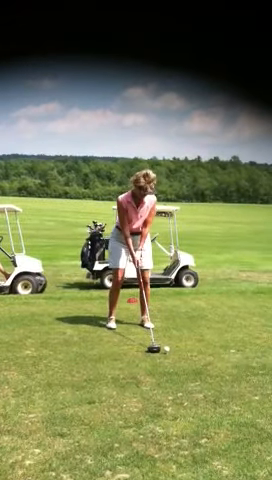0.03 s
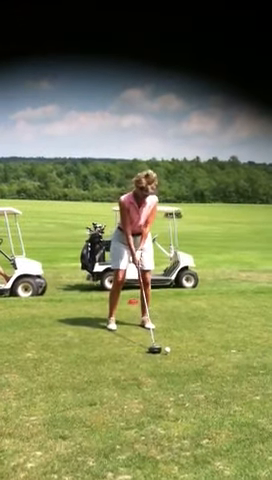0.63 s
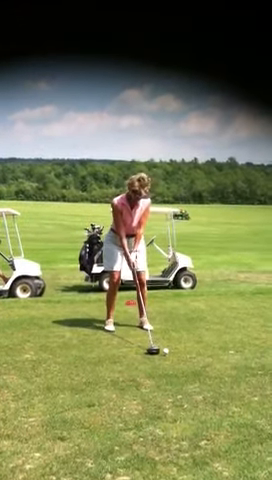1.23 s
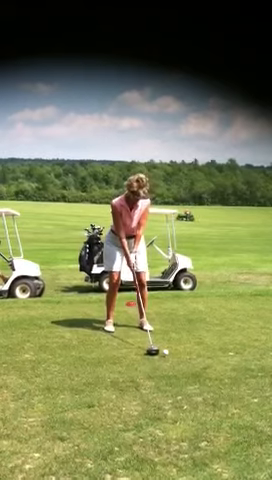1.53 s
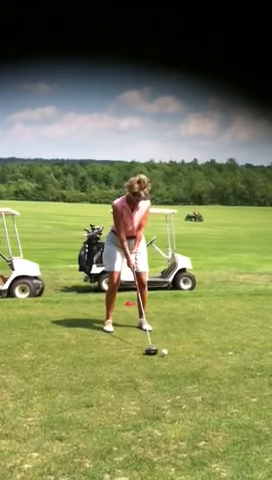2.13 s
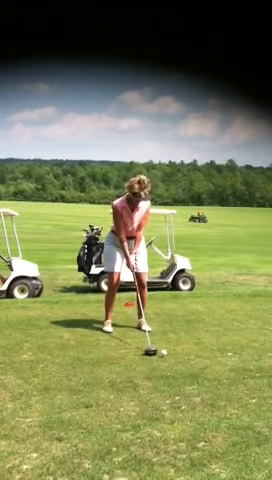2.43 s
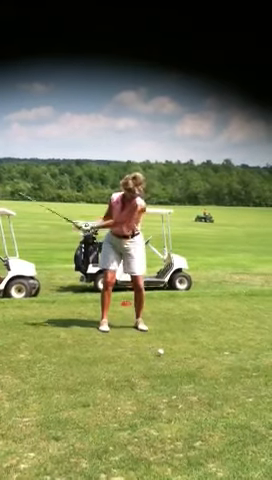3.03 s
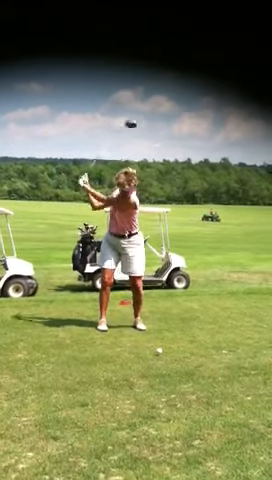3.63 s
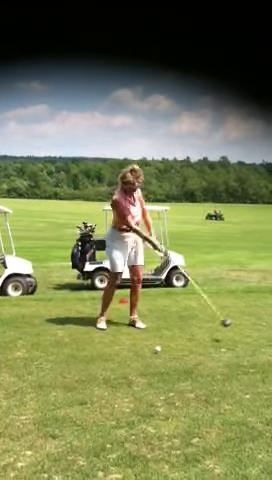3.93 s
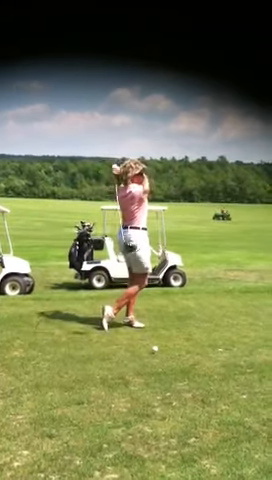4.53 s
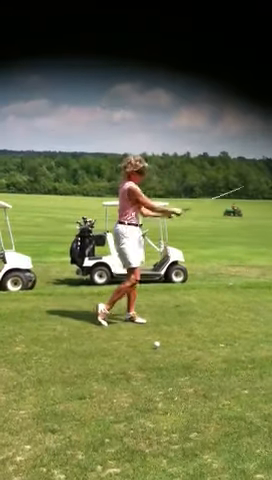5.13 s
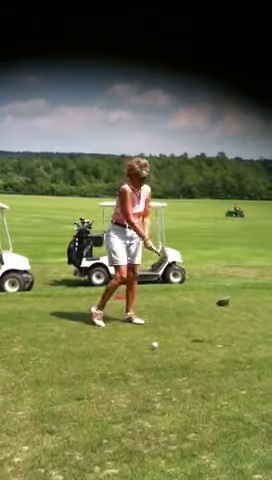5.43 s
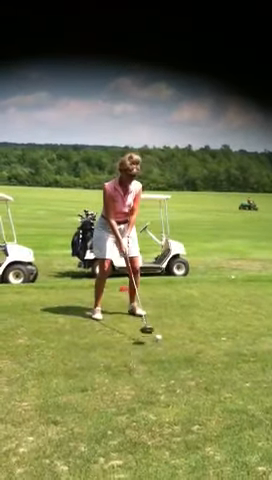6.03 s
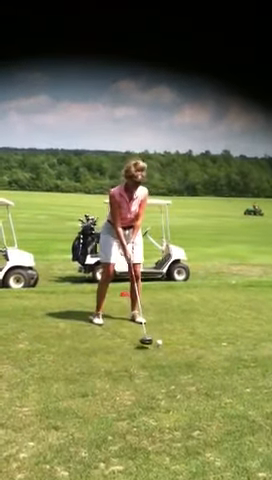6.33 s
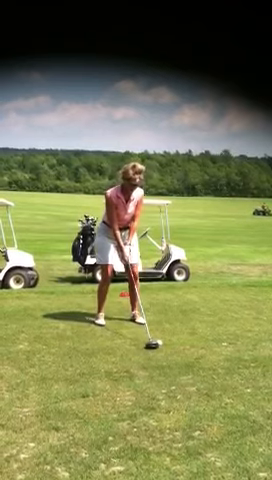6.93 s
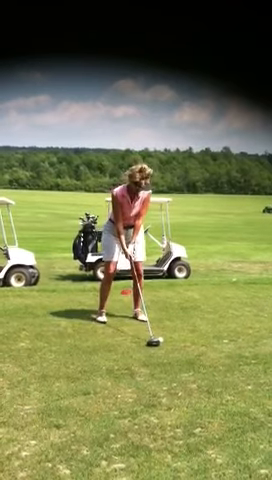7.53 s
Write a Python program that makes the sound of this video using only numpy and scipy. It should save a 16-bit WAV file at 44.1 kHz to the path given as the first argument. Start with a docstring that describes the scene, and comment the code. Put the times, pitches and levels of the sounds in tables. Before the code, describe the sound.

Gusts of wind rumble and thump on a small microphone at an open golf course, then die down. A breeze hisses softly in the trees and grass while a distant mower drones with a thin whine. A golf club swishes once, barely brushing the turf, followed by soft rustling. A far bird whistles, a faint hollow blip sounds, and the wind returns at the end.

```python
"""Open golf course. From the start, gusts buffet a small microphone: eddies at its port rumble and thump.
Throughout, a breeze hisses in trees and grass and a far three-cylinder mower drones with a thin whine.
The gusts die down by 3 s. At 4 s a practice swing swishes once and just clips the turf; the golfer
then rustles softly. After 6 s a distant bird whistles, then a faint hollow blip sounds.
The gusts return at the end."""
import sys
import numpy as np
from scipy import signal
from scipy.fft import rfft, irfft, next_fast_len
from scipy.io import wavfile
from scipy.ndimage import uniform_filter1d

SR = 44100
rng = np.random.default_rng(int(sys.argv[2]) if len(sys.argv) > 2 else 0)


def wav_record(signal):
    """Record a signal, one row per channel, as 16-bit PCM in the file named by sys.argv[1]."""
    frames = np.transpose(np.atleast_2d(signal))
    bounded = np.clip(frames, -1, 1)
    # unit amplitude maps onto the largest positive 16-bit level
    quanta = np.round(bounded * 32767).astype(np.int16)
    wavfile.write(sys.argv[1], SR, quanta)


N = 343539

# gusts: t at full strength/s, hold/s, rise/(dB/s), fall/(dB/s), rumble/dB, flutter/dB
WIND_GUSTS = [(0.028, 0.42, 300, 139, -27.5, -45.5), (0.489, 0.084, 199, 152, -25, -44),
              (0.874, 0.057, 58, 400, -31, -51.5), (1.143, 0.48, 998, 155, -26.5, -44.5),
              (2.262, 0.31, 50, 130, -27, -50.5), (7.75, 0.0088, 900, 300, -31.5, -37.5)]


def from_db(db):
    """Decibels to gain."""
    return 10 ** (np.asarray(db) / 20)


def unit_rms(x):
    """Scale to rms 1."""
    return x / np.sqrt(np.mean(x ** 2) + 1e-20)


def white():
    """Fresh white noise."""
    return rng.standard_normal(N)


def curves(rows):
    """Breakpoint rows (t/s, values...) to one per-sample curve per value column."""
    times_s, *columns = np.transpose(rows)
    return [np.interp(np.arange(N) / SR, times_s, column) for column in columns]


def swell(at_s, width_s):
    """Gaussian envelope, peak 1."""
    return np.exp(-.5 * ((np.arange(N) / SR - at_s) / width_s) ** 2)


def drift(rate_hz):
    """Low-passed random wander, rms 1."""
    hop, settle = 40, 2000
    pole = np.exp(-2 * np.pi * rate_hz * hop / SR)
    noise = rng.standard_normal(N // hop + settle + 2)
    slow = signal.lfilter([1], [1, -2 * pole, pole * pole], noise)[settle:]
    return np.interp(np.arange(N) / hop, np.arange(len(slow)), unit_rms(slow))


def band(x, low_hz, high_hz):
    """Causal band-pass."""
    return signal.sosfilt(signal.butter(2, [low_hz, high_hz], "band", fs=SR, output="sos"), x + 1e-18)


def colour(x, spectrum):
    """Shape by rows (f/Hz, level/dB), rolling off past both ends; rms 1."""
    hz, db = np.transpose(spectrum)
    size = next_fast_len(N)
    bins_hz = np.maximum(np.arange(size // 2 + 1) * SR / size, 1)
    gain = from_db(np.interp(np.log(bins_hz), np.log(hz), db))
    gain *= np.minimum(bins_hz / hz[0], 1) ** 2 * np.minimum(hz[-1] / bins_hz, 1) ** 4
    return unit_rms(irfft(rfft(x, size) * gain, size)[:N])


def steadied(x, span_s):
    """Hold the running rms at 1; quicker lumps remain."""
    return x / np.sqrt(np.abs(uniform_filter1d(x ** 2, int(span_s * SR))) + 1e-9)


def add(track, sound, centre_s, peak_db):
    """Mix in a short sound at a given peak level."""
    at = int(centre_s * SR) - len(sound) // 2 + np.arange(len(sound))
    inside = (at >= 0) & (at < N)
    track[at[inside]] += from_db(peak_db) * sound[inside] / np.abs(sound).max()


def breeze_and_rustles(shimmer_db=0.62):
    """Breeze hisses in trees and grass; short rustles, some from the golfer moving after the swing."""
    # foliage spectra: f/Hz, relative density/dB
    tree_spectrum = [(400, 0), (800, -11), (1200, -5), (1600, 0.5), (2100, 2.5), (2600, -1.5), (3100, -4),
                     (4000, -17.5), (6000, -30.5)]
    leaf_spectrum = [(1800, -22.5), (2600, -0.5), (3150, 2), (3450, -1.5), (3900, 4.5), (4400, -3),
                     (4900, -6), (5400, -17.5), (8000, -17.5), (13000, -41)]
    grass_spectrum = [(1500, -15.5), (3000, -13.5), (4500, 5), (5400, 3.5), (5650, 1.5), (6000, 2),
                      (6500, 1.5), (7700, -2), (8150, -2), (8650, -5), (9200, -3.5), (9450, -5),
                      (10500, -8), (11800, -14), (13000, -22)]
    # sustained breeze: t/s, trees/dB, leaves/dB, grass/dB
    foliage_levels = [(0.05, -63.5, -63.5, -67), (0.5, -59.5, -62, -65.5), (0.71, -60.5, -65, -66),
                      (1.41, -58.5, -65, -65.5), (1.7, -57, -62, -61.5), (2.1, -60, -63.5, -67),
                      (2.8, -63, -62, -65.5), (3.1, -58.5, -58.5, -64), (3.75, -58.5, -59.5, -63),
                      (4.0, -55.5, -59, -62.5), (4.3, -59, -59, -64), (4.75, -59.5, -58.5, -65),
                      (5.2, -56, -60, -62.5), (5.55, -55, -57, -62.5), (5.88, -57, -62.5, -63),
                      (6.12, -60, -63.5, -65), (6.7, -57, -62.5, -65), (7.28, -56.5, -58.5, -63),
                      (7.7, -58.5, -61.5, -63.5)]
    # short rustles: t/s, width/s, grass band/dB, leaf band/dB
    rustles = [(1.56, 0.045, -65, -72), (1.72, 0.1, -71, -69), (2.4, 0.5, -66, -72), (3.3, .1, -70, -68),
               (3.58, 0.037, -62, -62), (3.94, 0.034, -65, -65), (4.16, 0.08, -61.5, -59),
               (4.46, 0.069, -65, -60), (5.05, 0.16, -69, -68), (5.44, 0.054, -60, -62),
               (5.57, 0.043, -62, -58), (5.77, 0.055, -68, -72), (7.4, 0.085, -65, -64)]
    # murmur of far air: t/s, level/dB
    air_levels = [(0, -59.5), (3.6, -60), (4.5, -60.5), (5.3, -62), (5.5, -66.5), (5.8, -62), (6.9, -58.5),
                  (7.79, -61)]
    trees_db, leaves_db, grass_db = curves(foliage_levels)
    air_db, = curves(air_levels)
    rustle_power = sum((from_db(db)[:, None] * swell(at_s, width_s)) ** 2
                       for at_s, width_s, *db in rustles)
    grass_rustle, leaf_rustle = np.sqrt(rustle_power)
    leaf_gain = np.hypot(from_db(leaves_db), leaf_rustle)
    grass_gain = np.hypot(from_db(grass_db), grass_rustle)
    trees = from_db(trees_db + shimmer_db * drift(9)) * colour(white(), tree_spectrum)
    leaves = leaf_gain * from_db(shimmer_db * drift(11)) * colour(white(), leaf_spectrum)
    grass = grass_gain * from_db(shimmer_db * drift(14)) * colour(white(), grass_spectrum)
    air = from_db(air_db) * unit_rms(band(white(), 510, 1900))
    return trees + leaves + grass + air


def mower(drone_db=-47.5, roar_db=-56.5, throb_depth=0.35, jitter_db=1.0, fade_db=0.5, waver_db=1.5):
    """Three firings per engine cycle; one louder cylinder makes it throb. The whine fades on the wind."""
    # governed speed: t/s, firing rate/Hz
    firing_rates = [(0, 64.6), (1.0, 64.7), (3.6, 64.5), (4.3, 64.65), (5.5, 64.4), (6.15, 64.25),
                    (6.9, 64.75), (7.79, 64.7)]
    # exhaust lines: multiple of cycle rate, relative level/dB
    # multiples of 3 are firing lines; uneven cylinders add the rest
    exhaust_lines = [(3, -27), (5, -28.5), (6, 1.5), (7, -9), (8, -16), (9, 4), (10, -9.5), (11, -21),
                     (12, 5), (14, -16), (15, -19.5), (16, -19), (18, -14.5), (22, -23.5), (24, -19)]
    # two whines: multiple of firing rate, relative level/dB
    whine_lines = [(16, 0), (18, -7), (21, -8.5)]
    second_lines = [(14.25, -4.5), (24, 0)]  # near 920 and 1550 Hz; fade separately from the first whine
    # whines carried by the wind: t/s, first/dB, second/dB
    whine_levels = [(0, -67, -75), (0.65, -67.5, -85), (0.92, -60.5, -70), (1.6, -62.5, -66.5),
                    (2.0, -67, -66), (2.7, -65.5, -69), (3.05, -66, -74), (3.55, -61, -75),
                    (4.05, -63.5, -65), (4.25, -67, -76), (4.5, -62, -77), (4.75, -67, -68),
                    (5.08, -63, -72), (5.42, -75, -79), (5.82, -62.5, -69), (6.15, -72, -67),
                    (6.9, -74, -65.5), (7.35, -69, -65), (7.79, -76, -72)]
    # dull roar: f/Hz, relative density/dB
    roar_spectrum = [(25, -32), (50, -20.5), (80, -20), (105, -12), (130, -14), (180, -12), (208, 10.5),
                     (228, 9.5), (270, 2), (330, -1.5), (400, -10), (480, -17), (800, -17.5)]
    firing_hz, = curves(firing_rates)
    whine_db, second_db = curves(whine_levels)
    firing_phase = 2 * np.pi * np.cumsum(firing_hz * (1 + .0007 * drift(3))) / SR
    cycle_phase = firing_phase / 3
    exhaust = sum(from_db(db + jitter_db * drift(1.6)) * np.cos(k * cycle_phase)
                  for k, db in exhaust_lines)
    drone = from_db(drone_db) * unit_rms(exhaust)
    whine = np.zeros(N)
    for k, db in whine_lines:
        line_db = whine_db + db + fade_db * drift(0.62) + waver_db * drift(5.4)
        whine += from_db(line_db) * np.cos(k * firing_phase + .5 * drift(11))
    second_gain = from_db(second_db + fade_db * drift(3.4))
    second_whine = sum(from_db(db) * np.cos(k * firing_phase + .61 * drift(12))
                       for k, db in second_lines)
    throb = 1 + throb_depth * np.cos(cycle_phase)
    roar = from_db(roar_db) * colour(white() * throb, roar_spectrum)
    return drone + whine + second_gain * second_whine + roar


def blip(at_s=6.635, width_s=0.022, level_db=-59):
    """One short, hollow, far sound: narrow-band noise."""
    return from_db(level_db) * swell(at_s, width_s) * steadied(band(white(), 780, 1020), .05)


def bird():
    """Soft distant whistles, sagging in pitch towards their end."""
    # whistles: start/s, end/s, start f/Hz, end f/Hz, peak/dB
    whistles = [(6.12, 6.39, 3930, 3560, -60.5), (6.2, 6.42, 2860, 2760, -62)]
    t, out = np.arange(N) / SR, np.zeros(N)
    for start_s, end_s, start_hz, end_hz, db in whistles:
        progress = np.clip((t - start_s) / (end_s - start_s), 0, 1)
        hz = (start_hz + (end_hz - start_hz) * progress ** 2) * (1 + .007 * drift(60))
        out += from_db(db) * np.sin(np.pi * progress) * np.sin(2 * np.pi * np.cumsum(hz) / SR)
    return out


def swing(at_s=3.96, turf_s=3.963):
    """The shaft sheds a low whoosh at its fastest; the head brushes the grass tips."""
    whoosh = from_db(-47) * swell(at_s, .025) * steadied(band(white(), 310, 480), .032)
    wake = from_db(-43.5) * swell(at_s + .035, .053) * steadied(band(white(), 105, 217), .044)
    air = from_db(-61) * swell(at_s, .06) * unit_rms(band(white(), 700, 2500))
    turf = from_db(-63.5) * swell(turf_s, .009) * unit_rms(band(white(), 6000, 11200))
    return whoosh + wake + air + turf


def gust_db(full_s, hold_s, rise_db_per_s, fall_db_per_s):
    """One gust's level re full strength: rise, hold, fall."""
    t = np.arange(N) / SR
    before_s, after_s = np.maximum(full_s - t, 0), np.maximum(t - full_s - hold_s, 0)
    return np.maximum(-rise_db_per_s * before_s - fall_db_per_s * after_s, -100)


def flow_db(puff_width_s=0.013):
    """Wind strength at the port as rumble level: power sum of light air, gusts and puffs."""
    # light air between gusts: t/s, level/dB
    light_air = [(0, -53), (1.8, -44), (2.9, -44.5), (3.3, -58.5), (4.1, -56), (4.9, -58), (6.3, -73),
                 (6.7, -55.5), (7.79, -53)]
    # brief puffs: t/s, level/dB
    puffs = [(0.69, -35), (0.72, -45), (0.765, -32.5), (1.036, -33.5), (1.665, -49), (1.86, -36),
             (1.965, -34), (2.01, -34.5), (2.07, -30), (2.29, -36), (2.793, -29), (2.874, -32.5),
             (3.08, -44.5), (3.23, -43.5), (3.455, -37.5), (3.62, -41.5), (3.735, -52), (4.29, -50),
             (4.7, -46), (6.75, -49), (7.44, -49), (7.65, -45.5), (7.78, -34)]
    power = from_db(curves(light_air)[0]) ** 2
    power += sum(from_db(db + gust_db(*shape)) ** 2 for *shape, db, _ in WIND_GUSTS)
    power += sum((from_db(db) * swell(at_s, puff_width_s)) ** 2 for at_s, db in puffs)
    return 10 * np.log10(power)


def wind(full_gust_db=-25.5, lull_width_s=0.015):
    """Lumpy turbulence at the port: deep eddies in weak flow, small ones and flutter in strong flow."""
    # eddy spectra, largest eddies to finest: f/Hz, relative density/dB
    deep_spectrum = [(25, -32), (45, -36), (65, -17), (90, -1), (125, 6), (170, 8.5), (250, -5.5),
                     (400, -28)]
    large_spectrum = [(25, -43), (45, -50.5), (65, -42), (90, -28), (125, -4.5), (160, -0.5), (205, 2.5),
                      (250, -2), (310, -4.5), (400, -16.5), (500, -37.5), (700, -38), (1200, -50.5)]
    small_spectrum = [(200, -15.5), (320, 1.5), (400, 3.5), (480, 0), (560, -8), (660, -19.5), (800, -27.5),
                      (1000, -49), (1400, -41), (2000, -51.5)]
    flutter_spectrum = [(400, -4), (520, 0), (620, -2.5), (720, -9), (850, -16), (1000, -28), (1400, -29),
                        (2000, -46)]
    # momentary lulls: t/s, depth/dB
    lulls = [(0.158, 0), (0.415, 7), (0.479, 9), (0.802, 7), (1.27, 2), (1.566, 4.5), (1.815, 9), (1.9, 9),
             (1.945, 1), (2.035, 1.5), (2.135, 2), (2.453, 4.5)]
    # soft pushes of air: t/s, width/s, level/dB
    pushes = [(3.3, 0.35, -46), (4.3, 0.025, -53), (4.7, .04, -60), (6.64, 0.028, -48), (6.76, .025, -55),
              (7.225, 0.025, -42), (7.43, 0.091, -46.5)]

    def eddies(spectrum, lump_db, lump_hz, span_s):
        """Coloured noise with quick random lumps in level."""
        return steadied(colour(white() * from_db(lump_db * drift(lump_hz)), spectrum), span_s)

    large = eddies(large_spectrum, lump_db=3, lump_hz=58, span_s=.04)
    small = eddies(small_spectrum, lump_db=6.5, lump_hz=61, span_s=.068)
    flutter = eddies(flutter_spectrum, lump_db=7.5, lump_hz=56, span_s=.075)
    deep = steadied(colour(white(), deep_spectrum), span_s=.16)
    lull_db = sum(depth_db * swell(at_s, lull_width_s) for at_s, depth_db in lulls)
    rumble_db = flow_db() - lull_db
    deep_growth, small_growth, flutter_growth = 0.68, 1.98, 2.05  # dB per dB of flow
    deep_db = -37 + deep_growth * (rumble_db - full_gust_db)
    small_db = -31.5 + small_growth * (rumble_db - full_gust_db)
    flutter_gain = sum(from_db(db + flutter_growth * (gust_db(*shape) - lull_db))
                       for *shape, _, db in WIND_GUSTS)
    push_gain = sum(from_db(db) * swell(at_s, width_s) for at_s, width_s, db in pushes)
    deep_gain = np.hypot(from_db(deep_db), push_gain)
    return deep_gain * deep + from_db(rumble_db) * large + from_db(small_db) * small + flutter_gain * flutter


def pressure_bump(hz):
    """One push and pull of about one cycle, with room to ring out."""
    phase = 2 * np.pi * hz * np.arange(-SR // 10, SR // 10) / SR
    return phase * np.exp(-.5 * phase ** 2)


def buffets(pop_lead_s=0.0004, thump_lag_s=0.00051):
    """Single eddies hit the port: the sharp front pops, the pressure swing thumps."""
    # eddy hits: t/s, thump f/Hz, thump peak/dB, thump length/cycles, pop f/Hz, pop peak/dB
    hits = [(0.022, 201, -11, 1.95, 340, -32), (0.062, 280, -24, 0.87, 380, -25),
            (0.086, 245, -37, .7, 500, -22.5), (0.123, 238, -16, 1.04, 370, -31),
            (0.144, 200, -20, 0.75, 380, -33), (0.199, 235, -20, .8, 410, -26.5),
            (0.249, 305, -19, 0.84, 420, -29), (0.269, 290, -19, 1.3, 370, -40),
            (0.31, 214, -11, 0.99, 347, -39), (0.332, 188, -10.5, 1.06, 380, -28),
            (0.356, 265, -18, 1.1, 412, -26), (0.369, 250, -16, 0.71, 390, -32),
            (0.392, 220, -18.5, 1.1, 350, -38), (0.437, 213, -19, 1.3, 353, -29),
            (0.459, 276, -15.5, .6, 375, -25), (0.511, 149, -13, 1, 730, -27.5),
            (0.531, 252, -17, 0.86, 400, -24.5), (0.565, 225, -17, 0.92, 418, -29),
            (0.573, 215, -14.5, 1.7, 320, -26), (0.588, 221, -20, 1, 430, -30),
            (0.759, 280, -30, 0.56, 320, -44), (0.82, 302, -24.5, 0.82, 370, -34),
            (0.876, 240, -22, 1.7, 380, -32), (0.915, 240, -22, 1, 320, -41),
            (1.038, 228, -28, 2.1, 300, -55), (1.143, 218, -16, 1.3, 320, -38),
            (1.152, 239, -17.5, 1.2, 340, -45), (1.185, 180, -21.5, 0.9, 400, -37),
            (1.202, 182, -11.5, 1.06, 380, -35), (1.22, 282, -26, 0.78, 440, -23),
            (1.227, 220, -12.5, 0.8, 380, -19.5), (1.237, 244, -15, 0.86, 475, -22.5),
            (1.251, 197, -20, 1, 350, -35), (1.288, 210, -10, 1.15, 443, -29),
            (1.321, 201, -25, 0.86, 462, -19), (1.336, 227, -14.5, 1.6, 388, -22),
            (1.345, 223, -17, 1.2, 420, -26.5), (1.367, 210, -17, 3.1, 350, -30),
            (1.411, 230, -18.5, 1.3, 400, -40), (1.423, 260, -16, 0.54, 420, -24),
            (1.437, 218, -10, 1.13, 420, -28), (1.457, 263, -18.5, 0.64, 390, -30),
            (1.504, 235, -18.5, 2.3, 350, -36), (1.541, 225, -17, 1.1, 420, -35),
            (1.588, 186, -11, 1.04, 320, -30), (1.596, 250, -27, 0.73, 380, -25),
            (1.693, 233, -20.5, 0.97, 346, -28), (1.721, 251, -19, 0.53, 324, -22),
            (1.855, 252, -29, 1.9, 307, -53), (2.062, 290, -27, 0.6, 340, -31),
            (2.097, 265, -25.5, 0.94, 330, -35), (2.22, 273, -23, 1.2, 395, -27),
            (2.29, 237, -18, 2.1, 328, -41), (2.311, 320, -19, 0.82, 340, -42),
            (2.379, 240, -20, 1.7, 397, -35), (2.421, 252, -15, 1.8, 350, -43),
            (2.491, 285, -20, 1.5, 340, -35), (2.533, 270, -13, 1.1, 350, -30),
            (2.547, 217, -16.5, 1, 370, -23), (2.577, 280, -16.5, 0.94, 360, -27),
            (2.648, 227, -29, 1.8, 310, -53), (2.793, 209, -13.5, 1.1, 363, -29.5),
            (2.822, 290, -31, 0.72, 323, -41), (2.862, 267, -32, 0.88, 320, -44),
            (2.996, 302, -37.5, 0.8, 330, -48), (3.051, 297, -31, .9, 320, -47),
            (3.463, 222, -27.5, 0.8, 300, -46), (3.494, 290, -22, 0.88, 300, -46),
            (3.509, 193, -22.5, 1, 340, -31), (7.224, 198, -24, 0.62, 275, -44),
            (7.752, 208, -16.5, .9, 414, -21.5), (7.763, 169, -21, 1.2, 330, -42),
            (7.778, 205, -22.5, 1.6, 300, -48)]
    out, age_s = np.zeros(N), np.arange(-SR // 25, SR // 25) / SR
    signs = rng.choice([-1, 1], len(hits))
    for (at_s, thump_hz, thump_db, length_cycles, pop_hz, pop_db), sign in zip(hits, signs):
        cycles = thump_hz * age_s
        thump = np.cos(2 * np.pi * cycles) / np.cosh(2 * cycles / length_cycles)
        add(out, sign * band(thump, 83, 900), at_s + thump_lag_s, thump_db)
        add(out, sign * band(pressure_bump(pop_hz), 200, 3000), at_s - pop_lead_s, pop_db)
    return out


def scene():
    """All sources at one microphone."""
    return (wind() + buffets() + mower() + breeze_and_rustles() + swing() + bird() + blip())[None]


def record(dry):
    """Steep elliptic low-pass."""
    cutoff_hz = 13400
    return signal.sosfilt(signal.ellip(10, .1, 80, cutoff_hz, fs=SR, output="sos"), dry)


dry = scene()
out = record(dry)
wav_record(out)
```